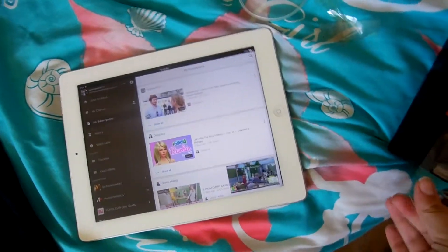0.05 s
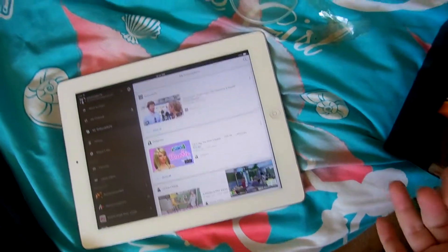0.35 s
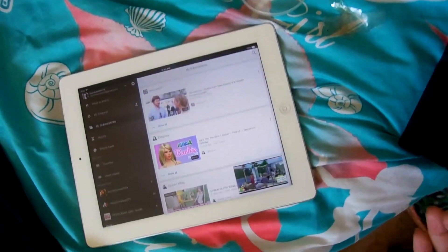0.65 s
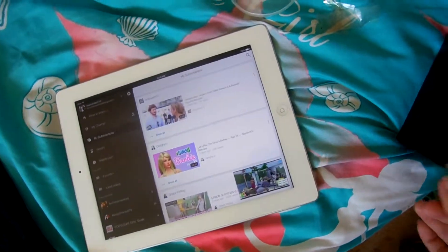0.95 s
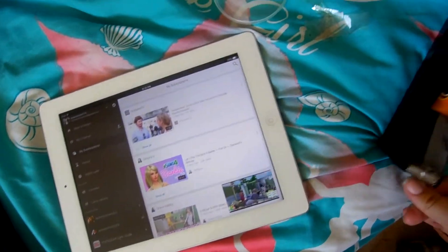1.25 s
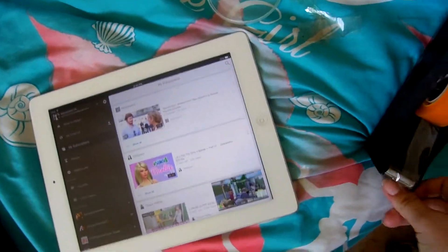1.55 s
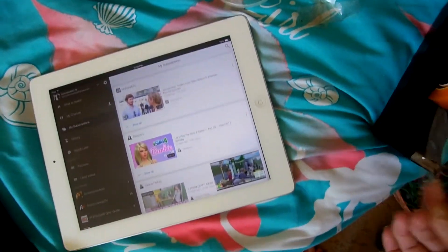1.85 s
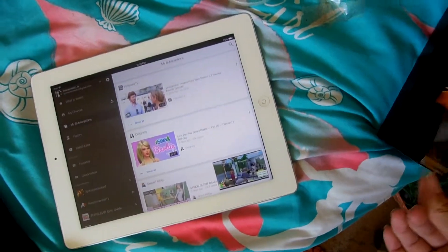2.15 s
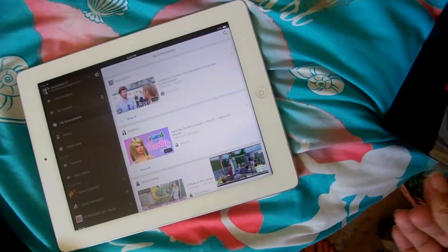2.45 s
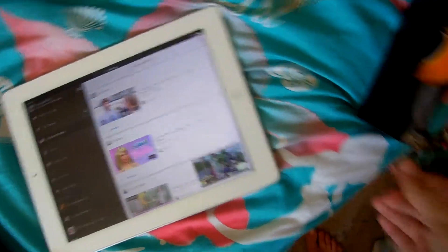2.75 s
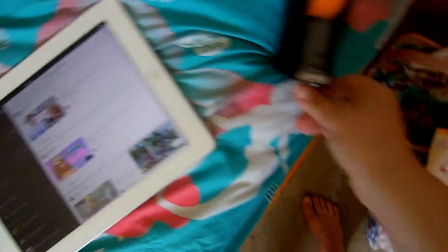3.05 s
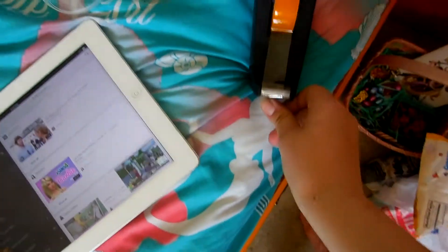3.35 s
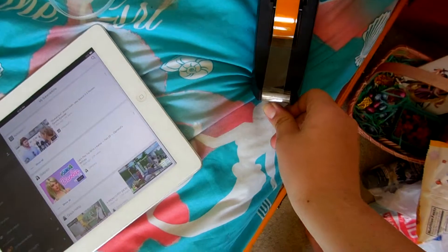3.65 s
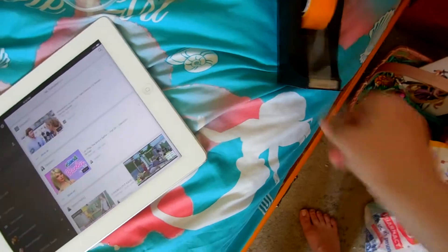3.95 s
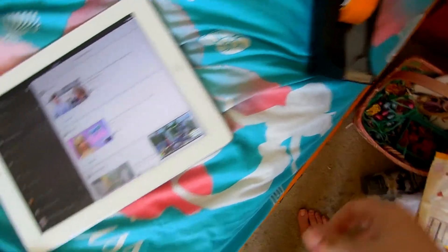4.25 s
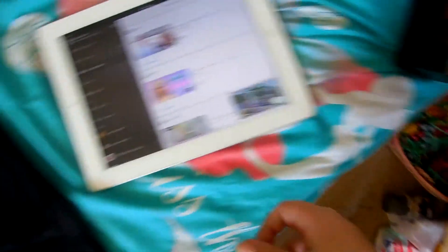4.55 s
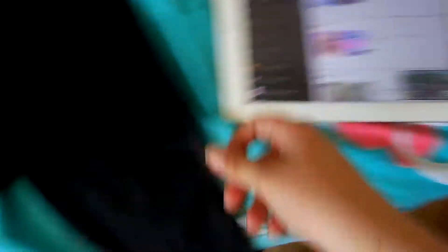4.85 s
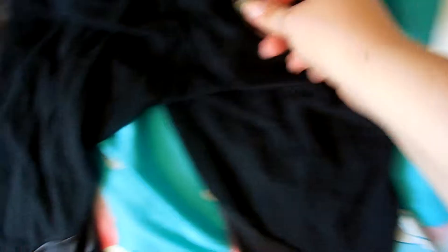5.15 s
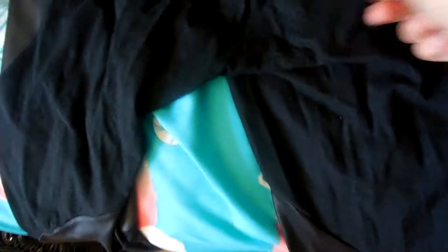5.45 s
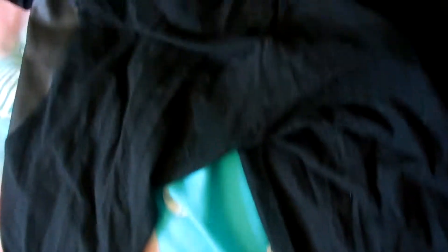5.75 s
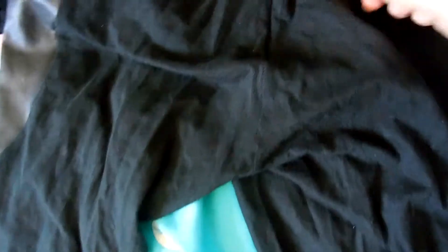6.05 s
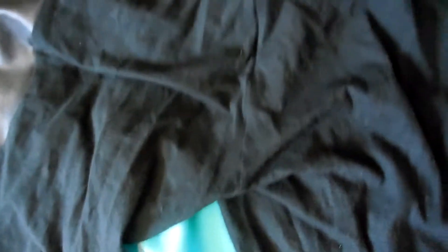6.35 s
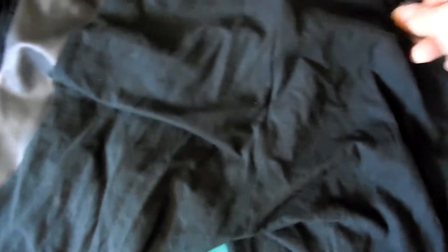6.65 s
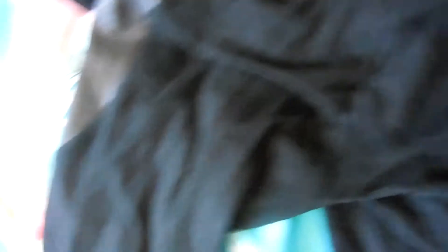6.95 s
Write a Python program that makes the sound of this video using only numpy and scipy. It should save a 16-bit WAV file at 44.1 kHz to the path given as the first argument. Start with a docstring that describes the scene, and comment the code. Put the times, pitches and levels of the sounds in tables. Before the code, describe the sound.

Sticky tape is handled close to the stereo microphones of a hand-held camera in a small, quiet room, sounding slightly to the left. For the first 2.5 seconds it peels in short crackles and irregular sharp snaps, with faint, thin fingertip slides and a hollow plastic clack from the dispenser at about 0.9 seconds. Around 3 seconds fingers tick on the camera body at the right, and again near 4.3. After a few more clicks, the strip tears off at about 3.9 seconds with a loud snap, a short rip and a soft thump. Sparse faint ticks follow. The tape is dabbed lightly on cloth at 5.4 and 6.1 seconds and pulled away in swelling, crackly rasps that let go at about 5.7, 6.4 and 7 seconds. A much louder dull bump lands near 6.9 seconds. Faint handling rumble and room hiss run underneath.

```python
"""A small, quiet room, with sticky tape handled close to the stereo microphones of a hand-held camera.
The stiff film buckles in sharp snaps, glue crackles as it peels, and a strip is torn off at the
dispenser. Then the tape is dabbed on cloth and pulled away in swelling rasps. There are soft, dull low
thumps and handling bumps, one under the tear and one much louder near the end. Fingers tick on the
camera body beside the right microphone; under it all lie the rumble of the hand and faint room tone."""
import sys
import numpy as np
from scipy import signal
from scipy.fft import rfft, irfft
from scipy.io import wavfile
from scipy.ndimage import uniform_filter1d

SR = 44100
rng = np.random.default_rng(int(sys.argv[2]) if len(sys.argv) > 2 else 0)


def transcribe(u):
    """Save the signal u as a 16-bit wav file named by the first command-line argument.

    u: samples, shape (n,) or (channels, n), limited to [-1, 1]; the rate is SR.
    q: integer samples, one column per channel.
    """
    v = np.clip(np.atleast_2d(u).T, -1, 1)
    q = np.round(v * 32767).astype(np.int16)
    wavfile.write(sys.argv[1], SR, q)


N = 317520
TIME, FREQS = np.arange(N) / SR, np.fft.rfftfreq(N, 1 / SR)
TAPS = 2048
BINS = np.fft.rfftfreq(TAPS, 1 / SR)


def film_snaps(sheen_hz=14800, sheen_full_db=-26, crack_hz=600, scatter_s=0.0006733):
    """The film buckles in one slip or a burst, ringing its taut part and loose flap; a sheen tops it."""
    # (time [s], level [dB], ring [Hz], octave [dB], flap [Hz], flap [dB], burst length [s], pan [dB])
    buckles = [ (0.1904, -32, 5688, -5.5, 2384, 1.5, 0.0000955, 5),
               (0.236, -41, 2483, -4.5, 600, -17.5, 0.00255, 2),
               (0.2834, -32.5, 3862, -30.5, 988, 11, 0.00101, -0.5),
               (0.2927, -26, 3850, -10.5, 908.3, -4, 0.0000364, 6),
               (0.3228, -34, 2000, -3, 1101, 4, 0.00271, 1.5),
               (0.343, -22.5, 4383, -11, 1869, -2, 0.001873, 10.5),
               (0.3616, -20.5, 4182, -8, 887, -3.5, 0.001939, 0),
               (0.795, -48, 3750, -30, 640, -19, 0.001044, 3.5),
               (0.8701, -25.5, 3755, -21.5, 756.5, 2, 0.002027, 2.5),
               (0.9714, -34.5, 2153, -8, 907.2, -9, 0.00101, 1),
               (1.0219, -38.5, 3529, -15.5, 600, -9.5, 0.0000889, 4),
               (1.277, -34.5, 4154, -23.5, 1306, -3.5, 0.001344, 3),
               (1.2876, -25, 6930, -16, 2406, -18, 0.000529, 7.5),
               (1.3358, -23.5, 4379, -6.5, 1850, -10, 0.002416, 5.5),
               (1.3489, -34.5, 4190, -7, 868.8, 1, 0.000735, -1),
               (1.4437, -46, 4623, -8, 600, -21, 0.000563, 6.5),
               (1.4791, -22.5, 4371, -17, 2400, -47, 0.000121, 7),
               (1.502, -27.5, 3808, -9, 2400, -19, 0.000576, 7.5),
               (1.8336, -32, 4269, -11, 600, -33.5, 0.001011, 3),
               (1.845, -23.5, 4400, -12, 2400, -39.5, 0.0001233, 18.5),
               (1.8624, -21.5, 4040, -4, 1800, 5.5, 0.0010507, 5.5),
               (1.955, -28, 6967, -7, 2057, 4.5, 0.001626, 9.5),
               (1.9859, -35.5, 5563, -30, 741.4, -8.5, 0.001647, 17.5),
               (1.9918, -21, 5427, -11.5, 1364, 1, 0.001339, 7.5),
               (2.0595, -23, 4229, -4.5, 1005, 2.5, 0.003473, 10),
               (2.0785, -23.5, 4201, -10, 1573, -1.5, 0.004603, 8.5),
               (2.1891, -21, 4076, -21, 1069, -11, 0.0001093, 6.5),
               (2.364, -48.5, 2000, -5.5, 710, 5, 0.002793, 3),
               (2.4265, -39.5, 3710, -14, 1368, 6, 0.00373, 5),
               (2.4497, -32, 3526, -12.5, 1530, 3.5, 0.001568, 5.5),
               (2.672, -47.5, 4067, -29.5, 1133, 0.5, 0.001203, 5),
               (2.8963, -44.5, 4149, -25.5, 777.7, -2.5, 0.000444, 4.5),
               (2.92, -43, 5471, -30, 1490, 1.5, 0.00095, 6),
               (3.0395, -25.5, 5025, -39, 1715, -3.5, 0.0001695, 1.5),
               (3.3146, -21, 8434, -11.5, 2400, -35.5, 0.0000476, 4.5),
               (3.3705, -35, 5599, -14.5, 600, -7.5, 0.0001062, 1.5),
               (3.428, -25.5, 7094, -20.5, 2400, -25.5, 0.0000949, 5),
               (3.4489, -24, 4599, -4, 600, -41, 0.0000703, 6.5),
               (3.6643, -25.5, 6971, -35.5, 3600, -11.5, 0.0000574, 7),
               (3.864, -18.5, 8837, -19.5, 2400, -33, 0.0003876, 3.5),
               (3.8659, -10, 8726, -26.5, 2436, -18.5, 0.001751, -2),
               (3.867, -13, 5504, -18, 2700, -6, 0.001826, -1.5),
               (3.878, -22.5, 3773, -1.5, 2400, -16.5, 0.001952, 11.5),
               (3.9717, -29.5, 4475, -6.5, 1280, -15.5, 0.000089, 21),
               (3.9814, -22.5, 5085, -25.5, 878.4, -15, 0.0001426, 11),
               (3.9938, -30.5, 7267, 2, 1658, -2.5, 0.000081, 18),
               (4.0569, -33, 4037, 1.5, 807.4, -7, 0.002682, 5.5),
               (4.134, -47, 4760, -18.5, 726, 2, 0.0016, 2),
               (4.4009, -34, 2360, -8, 1310, -10, 0.00323, 2.5),
               (4.547, -44, 3400, -29, 1700, 4.5, 0.004154, -2.5),
               (4.8352, -40, 8200, -25, 970, -7, 0.0013, 6.5),
               (5.3875, -35.5, 5740, -8.5, 1140, -9.5, 0.00025, 8.5),
               (5.699, -20, 3790, -4, 600, -30.5, 0.003439, 14.5),
               (5.71, -21.5, 4391, -15.5, 800, -10, 0.003783, 2),
               (5.724, -28.5, 4910, -22.5, 840, -7.5, 0.0011, -3),
               (6.0812, -43.5, 3440, -2.5, 600, 4, 0.0016, 5.5),
               (6.3652, -27, 3322, -2, 600, -20.5, 0.0023, 0.5),
               (6.3779, -21, 4437, -1, 2400, -17.5, 0.00034, 24),
               (6.3982, -27, 4160, 20.5, 600, 10, 0.0044, 5),
               (6.4292, -43, 3120, -11.5, 1075, -4, .0011, 1),
               (6.6012, -34.5, 3670, -17, 700, -26.5, 0.00011, 6),
               (6.6048, -29.5, 6360, -28.5, 720, -14.5, 0.000075, 9),
               (6.6467, -22.5, 4928, -18.5, 2983, -6, 0.0001393, 8.5),
               (6.7737, -44, 4350, -27.5, 718.2, -1.5, 0.000796, 6),
               (6.944, -24, 4052, -8.5, 1820, -2, 0.0002004, 9),
               (6.9554, -33.5, 3886, -3, 600, 3.5, 0.00261, -4)]
    out, t = np.zeros((2, N)), np.arange(TAPS) / SR
    impulse, lead = t == 0, TAPS // 8
    for s, db, hz, octave_db, flap_hz, flap_db, burst_s, pan_db in buckles:
        width = hz * (0.1573 + 0.12446 * amp(flap_db))  # a slack, flapping film blurs its ring
        # a bright top-treble resonance, which stops growing in the loudest snaps
        sheen_db = -16 - max(db - sheen_full_db, 0)
        crack_db = -25.5 + 23.5 * np.log10(burst_s / 0.001371 + 1e-3)  # longer burst, more broad crack
        power = (hump(hz, width) ** 2
                 + (amp(octave_db) * hump(2 * hz, 2 * width)) ** 2
                 + (amp(flap_db) * hump(flap_hz, 0.27 * flap_hz)) ** 2
                 + (amp(sheen_db) * hump(sheen_hz, 1600)) ** 2
                 + amp(crack_db) ** 2 * BINS ** 4 / (BINS ** 4 + crack_hz ** 4))
        # a long burst builds up and dies away; a short one is mostly its first slip
        age = t / (burst_s + 1e-5)
        slips = rng.standard_normal(TAPS) * np.sqrt(age) * np.exp(-1.3 * age)
        first_slip = 0.89 * np.exp(-burst_s / 0.0007145) * impulse
        burst = slips / np.linalg.norm(slips) + first_slip
        spectrum = whitened(burst, size=30) * rfft(ring(np.sqrt(power)))
        # the hand scatters the sound a little differently toward each microphone
        paths = rng.standard_normal((2, TAPS)) * np.exp(-t / scatter_s)
        paths = impulse + 0.8029 * paths / np.linalg.norm(paths, axis=1, keepdims=True)
        pair = [irfft(spectrum * whitened(path, size=50)) for path in paths]
        snap = np.array([at_level(np.roll(x, lead)[:TAPS // 2], db) for x in pair])
        add(out, s - lead / SR, placed(snap, pan_db))
    return out


def tear(jerk_s=3.868, rip_s=3.905, sag_db_per_s=48):
    """The strip is jerked onto the steel cutter, then rasps across it ever more weakly until it parts."""
    # spectrum of the tearing film: (frequency [Hz], level [dB])
    colour = [(59, -7), (100, -2.5), (219, -5.5), (442, -8), (583, -11), (1010, -10), (1130, -10.5),
              (2580, -5.5), (3250, -5), (5300, -1), (6560, -8), (7770, -2.5), (16000, -12)]
    # faint resonances of the cutter: (frequency [Hz], half-width [Hz], lift [dB])
    blade_modes = [(2700.2, 72.5, 5), (6150, 130, 2.5), (7950, 200, 1), (9547.6, 180, 3)]
    jerk = swell(jerk_s, db=-22.5, rise_s=0.012, fall_s=0.09935)
    rip = swell(rip_s, db=-31.5, rise_s=0.07677, fall_s=0.185, hold_s=0.15)
    sag = amp(-sag_db_per_s * np.maximum(TIME - rip_s, 0))
    tearing = rasp(jerk + sag * rip, colour, per_s=1900, spread_db=4, hiss=0.6354,
                   apart=0.8, grip_db=3.5, pan_db=5.5)
    blade = 1 + sum((amp(db) - 1) * hump(hz, width) for hz, width, db in blade_modes)
    return coloured(tearing, blade)


def cloth_pulls(drag_db=-37, tension_power=2.631):
    """Tape is dabbed on cloth and pulled: a light drag tightens faster and faster until it lets go."""
    # tape pressed on: (time [s], relative level [dB])
    dabs = [(5.38, -34.5), (6.09, -41.5)]
    # tape pulled off: (start [s], release [s], relative level at release [dB])
    pulls = [(5.553, 5.713, -16), (6.277, 6.384, -17.5), (6.801, 7.01, -23)]
    # spectrum of tape on cloth: (frequency [Hz], level [dB])
    colour = [(120, -60.5), (200, -4.5), (836, -13.5), (1320, -8.5), (1560, -15.5), (1740, -5), (2420, -7),
              (2960, -2), (3760, -2.5), (5330, 0.5), (10500, -6), (13300, -8), (14900, -9), (16000, -14.5)]
    effort = swells(dabs, rise_s=0.10472, fall_s=0.1575)
    for start, release, db in pulls:
        tension = np.clip((TIME - start) / (release - start), 0, 1) ** tension_power
        pull_db = drag_db + (db - drag_db) * tension
        effort += swell(start, pull_db, rise_s=0.2947, fall_s=0.071, hold_s=release - start)
    return amp(-7.5) * rasp(effort, colour, per_s=4000, spread_db=3.5, hiss=1,
                            apart=1, grip_db=3, pan_db=5.5)


def glue_peel():
    """Threads of glue let go between the snaps."""
    # stretches of peeling: (time [s], relative level [dB], rise [s], fall [s])
    peels = [(.297, -31, 0.06904, 0.09223), (.37, -25, 0.0386, 0.08917), (1.96, -40, 0.1671, 0.1953),
             (2.02, -43.5, 0.0761, 0.0838), (2.075, -34.5, 0.03353, 0.1965), (2.44, -41, 0.1667, 0.1255)]
    # spectrum of the parting glue: (frequency [Hz], level [dB])
    colour = [(88, -71), (150, 2), (1170, -3.5), (1760, 4.5), (2400, 1.5), (2920, 2.5), (3840, -0.5),
              (6510, -4.5), (10400, -7.5), (11700, -9.5), (14500, -12), (16000, -15.5)]
    effort = sum(swell(*peel) for peel in peels)
    return amp(-3) * rasp(effort, colour, per_s=2500, spread_db=4.5, hiss=0.746,
                          apart=0.3893, grip_db=4, pan_db=-0.5)


def finger_slides():
    """A fingertip slides along the film with a thin, high rasp."""
    # strokes of the fingertip: (time [s], relative level [dB])
    strokes = [(.62, -54), (.715, -49), (.868, -45), (.98, -45.5), (1.352, -39.5), (1.505, -38)]
    # spectrum of skin on film: (frequency [Hz], level [dB])
    colour = [(200, -40.5), (1000, -25.5), (3000, -14), (4200, 8.5), (5500, -15), (8000, -2.5),
              (16000, -10)]
    effort = swells(strokes, rise_s=0.07285, fall_s=0.1188)
    return amp(-1) * rasp(effort, colour, per_s=3500, spread_db=4.5, hiss=0.873,
                          apart=0.948, grip_db=1.5, pan_db=4)


def dispenser_clacks(rise_s=0.000679):
    """A tug rings the hollow plastic dispenser briefly; a softer one reaches only its low modes."""
    # tugs on the tape: (time [s], level [dB], hardness as a corner [Hz])
    tugs = [(.3615, -33.5, 850), (.8715, -21, 4874), (2.0612, -36.5, 1000), (2.08, -38, 910),
            (2.189, -32, 723.2), (3.868, -46.5, 6010)]
    # modes of the dispenser: (frequency [Hz], level [dB], t60 [s])
    shell_modes = [(600, -17, 0.007672), (887.6, -1.5, 0.009477), (1552.1, 8, 0.010552),
                   (1850, -12.5, 0.04747), (2687.1, -10, 0.04235), (3750, -26.5, 0.01127),
                   (4350, 3.5, 0.01364)]
    out, t = np.zeros((2, N)), np.arange(SR // 10) / SR
    attack = 1 - np.exp(-t / rise_s)
    for s, db, corner_hz in tugs:
        shell = sum(amp(mode_db - 60 * t / t60) * np.sin(2 * np.pi * hz * t) / (1 + (hz / corner_hz) ** 4)
                    for hz, mode_db, t60 in shell_modes)
        add(out, s, placed(at_level(shell * attack, db), pan_db=3))
    return out


def low_thumps(rise_s=0.0020533):
    """Soft thumps and handling bumps: each a short push and a low, dull ring."""
    # thumps and bumps: (time [s], level [dB], ring time [factor], pitch [factor])
    bumps = [(0.394, -44, 0.1755, 0.9385), (2.08, -38.5, 0.5568, 1.8108), (3.8667, -29, 0.6405, 0.7449),
             (5.386, -47.5, 1.253, 0.949), (5.711, -37.5, 0.13, 1.5384), (6.084, -45.5, 1.14, 0.72),
             (6.8615, -18, 1.1134, 1.0862), (7.116, -46.5, 0.19, 1.114)]
    # low modes of a thump: (frequency [Hz], level [dB], t60 [s])
    low_modes = [(119.66, -8, 0.091), (160.93, -2, 0.11426), (225.88, -2.5, 0.11975), (251.75, -8, 0.11673),
                 (267.15, 14.5, 0.014), (325.88, -14.5, 0.12), (424.5, -4.5, 0.0087), (468.82, -24, 0.1755)]
    out, t = np.zeros((2, N)), np.arange(SR // 3) / SR
    attack = 1 - np.exp(-(t / rise_s) ** 2)
    for s, db, hold, pitch in bumps:
        thump = sum(amp(mode_db - 60 * t / (t60 * hold)) * np.sin(2 * np.pi * hz * pitch * t)
                    for hz, mode_db, t60 in low_modes)
        add(out, s, placed(at_level(thump * attack, db), pan_db=0))
    return out


def camera_ticks(leak_hz=95):
    """A finger beside the right microphone sends a one-sided push through the casing; it leaks away."""
    # fingers on the camera body: (time [s], relative level [dB], hardness, scaled to a corner [Hz])
    touches = [(0.7455, -41.5, 571.7), (0.818, -42, 458.3), (2.8606, -32, 556), (2.9855, -33.5, 667.7),
               (3.0115, -42, 4390.0), (3.0228, -44, 3390.0), (3.1141, -23.5, 3691), (3.1339, -30.5, 4773),
               (3.1532, -37, 2603), (3.1603, -22, 2869), (4.2928, -28, 1250), (4.3213, -43, 2700),
               (7.0595, -38, 378)]
    out = np.zeros((2, N))
    for s, db, hardness in touches:
        corner_hz = 1.3637 * hardness
        lowpass = 1 / (1 + (BINS / corner_hz) ** 2) ** 2
        leak = (BINS + 1) / np.hypot(BINS, leak_hz)
        add(out, s, placed(at_level(ring(lowpass * leak), db - 2), pan_db=-22))
    return out


def handling_rumble(holding_db=-49.5, unsteady_db=0.5):
    """The hand on the camera rumbles faintly and unsteadily, with a few jolts."""
    # jolts of the hand: (time [s], relative level [dB])
    jolts = [(3.87, -30), (5.41, -39.5), (5.73, -37), (6.11, -37), (6.66, -34), (6.92, -39.5)]
    # spectrum of the handling noise: (frequency [Hz], level [dB])
    colour = [(10, 1.5), (25, 1.5), (50, -15.5), (110, -18.5), (300, -35.5), (900, -52), (4000, -92)]
    drift = uniform_filter1d(rng.standard_normal(N), size=5000)
    wander = unit_rms(uniform_filter1d(drift, size=3000))
    effort = amp(holding_db + unsteady_db * wander) + swells(jolts, rise_s=0.1641, fall_s=0.45)
    return amp(-4.5) * effort * stereo_noise(colour, likeness=[(20, 0.8206), (300, 0.3)])


def small_room(x, wet_db=-15, onset_s=0.001):
    """The room adds a few early echoes and a short tail that lasts longest in the midrange."""
    # decay of the room: (frequency [Hz], t60 [s])
    decay = [(200, 0.0002), (1500, 0.321), (4500, 0.203), (9000, 0.1868), (16000, 0.1133)]
    # first reflections: (delay [s], level [dB])
    echoes = [(.0012, -17), (.0068, -31.5), (.0089, -18), (0.0098, -21.5), (0.0141, -24.5)]
    hz, t, spectra = signal.stft(rng.standard_normal((2, SR // 2)), SR, nperseg=256)
    tail = signal.istft(spectra * amp(-60 * t / curve(decay, hz)[:, None]), SR, nperseg=256)[1]
    tail *= np.clip(np.arange(tail.shape[1]) / SR / onset_s, 0, 1) ** 2
    tail *= amp(wet_db) / np.linalg.norm(tail[0])
    for delay, db in echoes:
        for side in range(2):
            tail[side, round(delay * SR) + rng.integers(0, 12)] += amp(db)
    return x + signal.fftconvolve(x, tail, axes=1)[:, :N]


def microphone_lag(x, lag_s=0.000016):
    """Airborne sound reaches the left microphone a moment after the right one."""
    return irfft(rfft(x) * np.exp(-2j * np.pi * FREQS * np.array([[lag_s], [0]])), N)


def room_tone(db=-54):
    """Steady room air and microphone hiss."""
    # spectrum of air and hiss: (frequency [Hz], level [dB])
    colour = [(24, -43), (40, -2), (180, -8.5), (305, -10.5), (345, -11), (585, -12.5), (790, -15.5),
              (1120, -14), (1370, -15.5), (1520, -17.5), (1760, -16.5), (4570, -19.5), (16000, -24)]
    # how alike the two microphones hear it: (frequency [Hz], correlation [0-1])
    likeness = [(60, 0.6859), (180, 0.12), (550, 0.3113), (1650, 0.0771), (4970, 0.017), (15000, 0.11)]
    return placed(amp(db) * stereo_noise(colour, likeness), pan_db=-1)


def rasp(effort, colour, per_s, spread_db, hiss, apart, grip_db, pan_db):
    """Threads of glue or fibre let go: tiny uneven clicks over a hiss, in clumps as the grip varies."""
    sizes = amp(spread_db * np.minimum(rng.exponential(1, N), 4)) * rng.choice([-1, 1], N)
    clicks = unit_rms(sizes * (rng.random(N) < per_s / SR))
    common = unit_rms(clicks + hiss * rng.standard_normal(N))
    pair = (common + apart * rng.standard_normal((2, N))) / np.sqrt(1 + apart ** 2)
    flutter = unit_rms(uniform_filter1d(rng.standard_normal(N), size=220))
    grip = unit_rms(amp(grip_db * flutter))
    return placed(coloured(pair * grip * effort, amp(curve(colour, BINS))), pan_db)


def stereo_noise(colour, likeness):
    """Noise with a given spectrum and left-right correlation."""
    left, other = rfft(rng.standard_normal((2, N)))
    same = curve(likeness, FREQS)
    right = same * left + np.sqrt(1 - same ** 2) * other
    return unit_rms(irfft(np.array([left, right]) * amp(curve(colour, FREQS)), N))


def swell(s, db, rise_s, fall_s, hold_s=0):
    """A gain that climbs 60 dB in rise_s to reach db at time s, holds, and drops 60 dB in fall_s."""
    t = TIME - s
    return amp(db - 60 * np.clip(np.maximum(-t / rise_s, (t - hold_s) / fall_s), 0, 3))


def swells(rows, rise_s, fall_s):
    """One swell for each (time [s], level [dB])."""
    return sum(swell(s, db, rise_s, fall_s) for s, db in rows)


def hump(hz, width):
    """Gain of a cluster of strongly damped modes: a flat top and steep sides."""
    return 1 / np.sqrt(1 + ((BINS - hz) / width) ** 4)


def ring(gain):
    """The causal impulse response whose spectrum has this shape at BINS."""
    log_gain = np.log(np.maximum(gain / gain.max(), 1e-5))
    mirrored = np.concatenate([log_gain, log_gain[-2:0:-1]])
    return np.fft.ifft(np.exp(np.conj(signal.hilbert(mirrored)))).real


def coloured(x, gain):
    """Passes a stereo sound through a unit-energy ring of this shape."""
    body = ring(gain)
    return signal.oaconvolve(x, body[None] / np.linalg.norm(body), axes=1)[:, :N]


def whitened(x, size):
    """Spectrum of a burst with its broad colour removed and its fine comb kept."""
    spectrum = rfft(x, TAPS)
    return spectrum / np.sqrt(uniform_filter1d(abs(spectrum) ** 2, size) + 1e-12)


def curve(points, hz):
    """Reads a table on a log-frequency axis."""
    f, value = np.transpose(points)
    return np.interp(np.log(hz + 1), np.log(f + 1), value)


def amp(db):
    """Decibels to gain."""
    return 10 ** (np.asarray(db) / 20)


def unit_rms(x):
    """Scales to rms 1."""
    return x / np.sqrt(np.mean(x ** 2) + 1e-20)


def at_level(x, db):
    """Scales a short sound so that its energy, packed into 5 ms, has this level."""
    return amp(db) * x / np.sqrt(np.sum(x ** 2) / (0.005 * SR) + 1e-20)


def placed(x, pan_db):
    """Shares a sound between the microphones at constant power; positive pan is to the left."""
    return unit_rms(amp([[pan_db / 2], [-pan_db / 2]])) * x


def add(mix, s, sound):
    """Mixes a stereo sound in at time s."""
    part = mix[:, max(round(s * SR), 0):][:, :sound.shape[1]]
    part += sound[:, :part.shape[1]]


def scene():
    """Close tape sounds in the room, over dry thumps, handling noise and room tone."""
    tape = glue_peel() + tear() + cloth_pulls() + finger_slides() + film_snaps()
    airborne = microphone_lag(small_room(tape + dispenser_clacks()))
    return airborne + low_thumps() + camera_ticks() + handling_rumble() + room_tone()


def record(dry, cutoff_hz=16100):
    """The camera clips peaks at full scale, then cuts the highest treble."""
    lowpass = signal.firwin(255, cutoff_hz, window=("kaiser", 9), fs=SR)
    return signal.oaconvolve(np.clip(dry, -1, 1), lowpass[None], "same")


dry = scene()
out = record(dry)
transcribe(out)
```